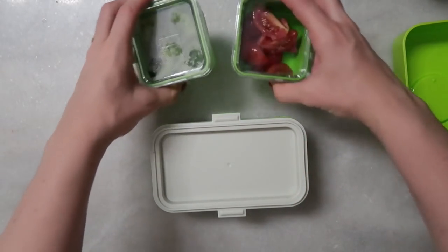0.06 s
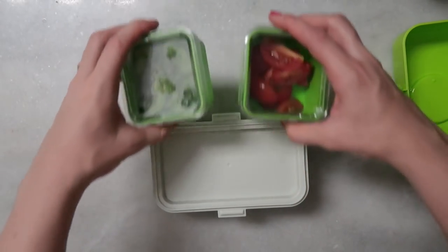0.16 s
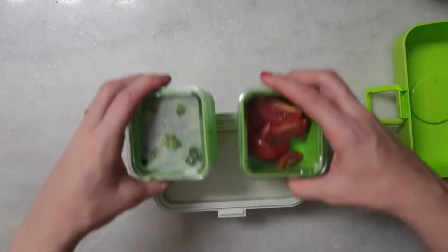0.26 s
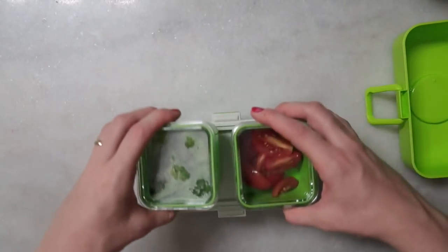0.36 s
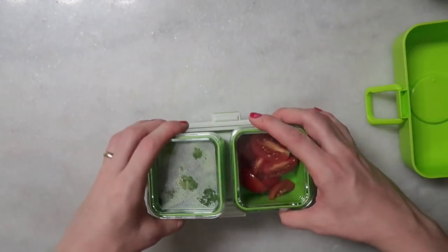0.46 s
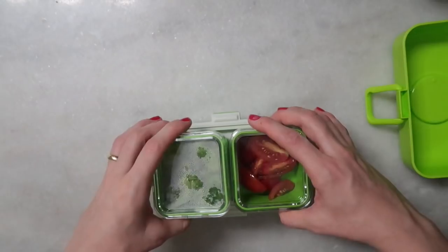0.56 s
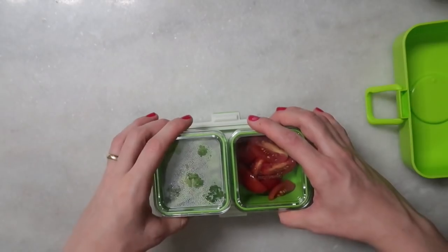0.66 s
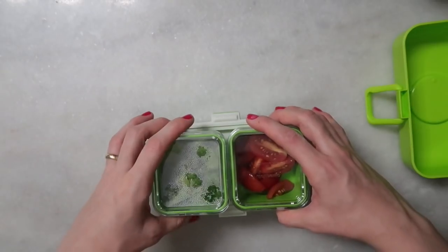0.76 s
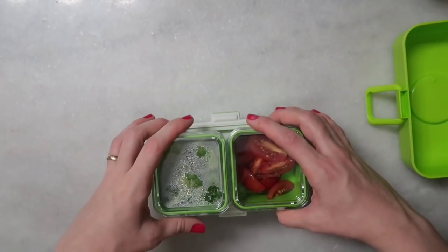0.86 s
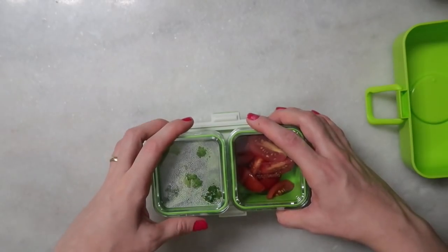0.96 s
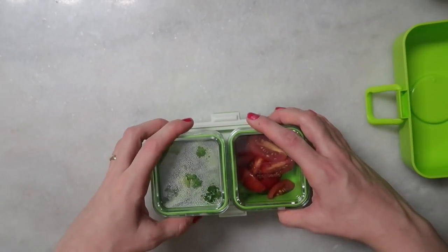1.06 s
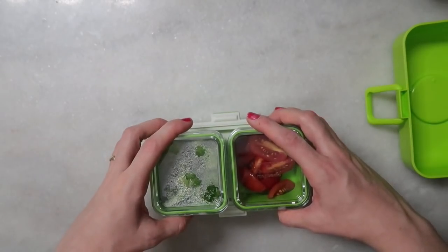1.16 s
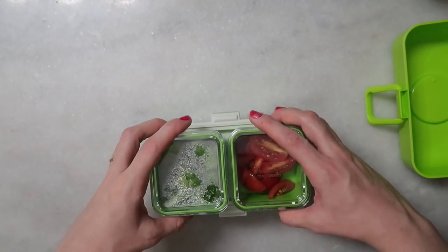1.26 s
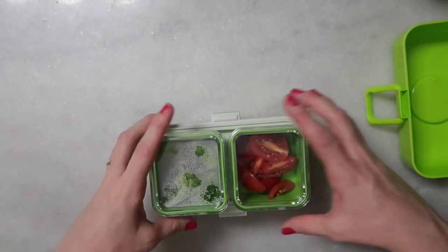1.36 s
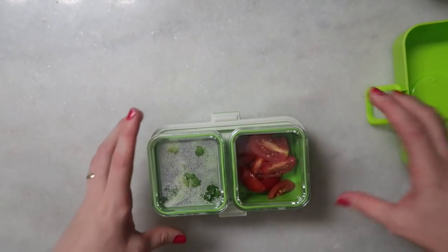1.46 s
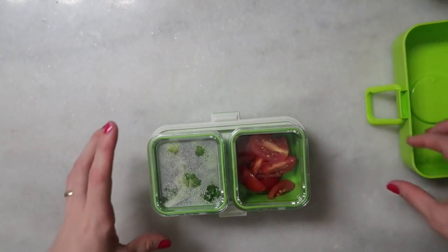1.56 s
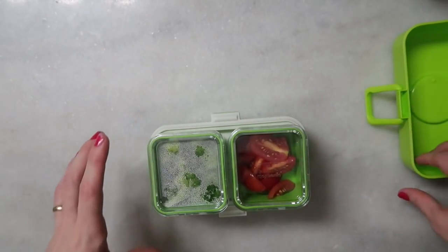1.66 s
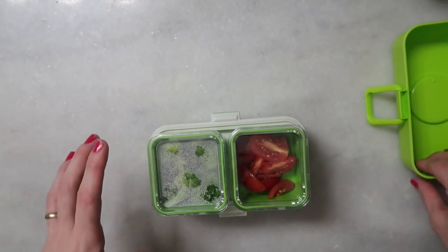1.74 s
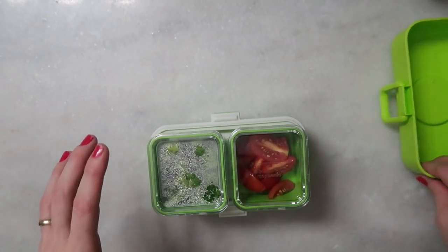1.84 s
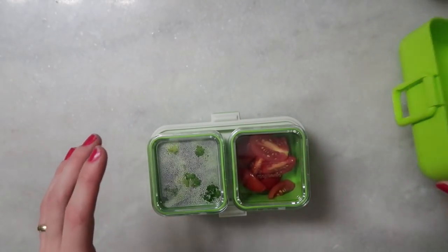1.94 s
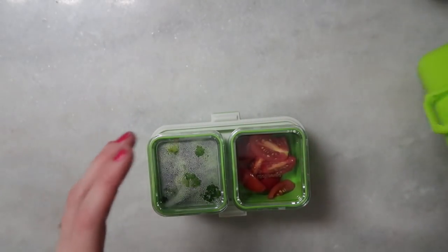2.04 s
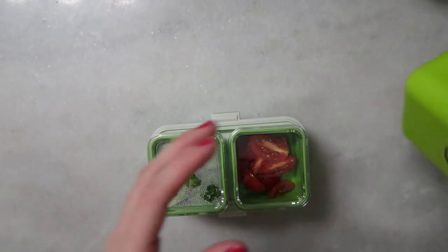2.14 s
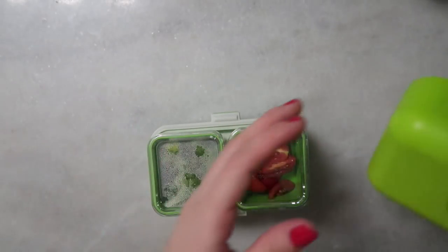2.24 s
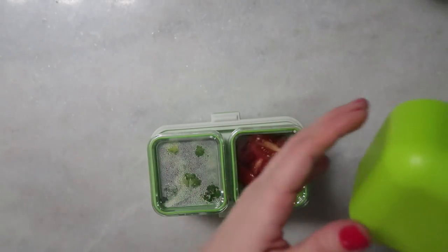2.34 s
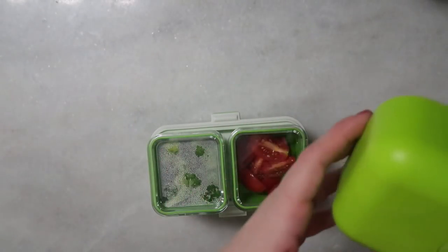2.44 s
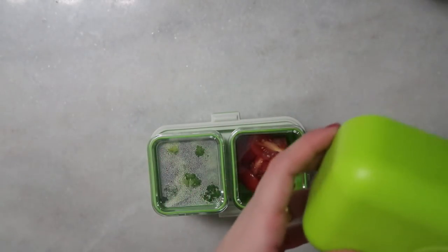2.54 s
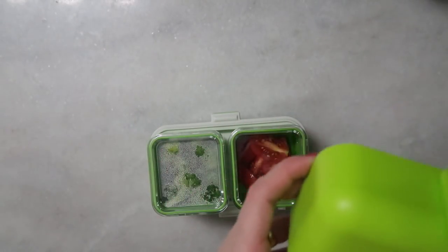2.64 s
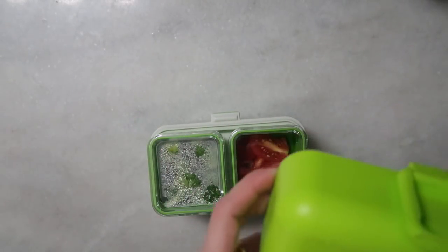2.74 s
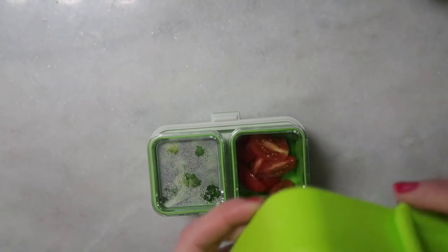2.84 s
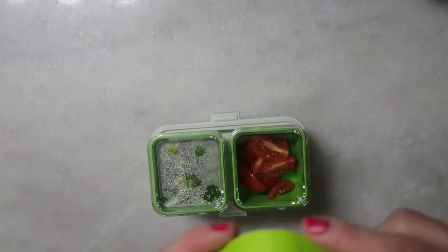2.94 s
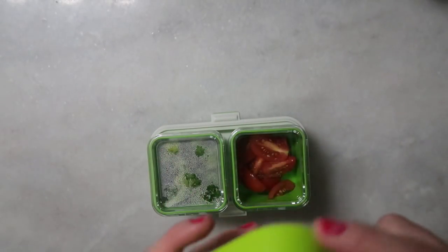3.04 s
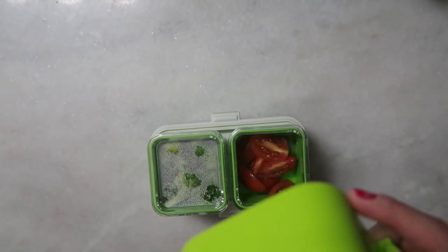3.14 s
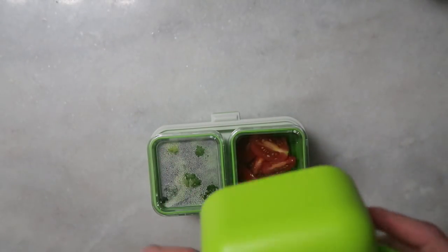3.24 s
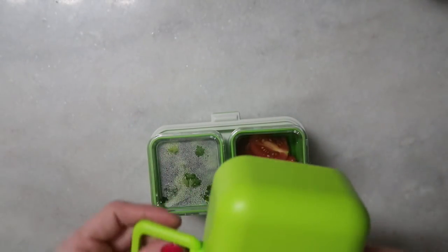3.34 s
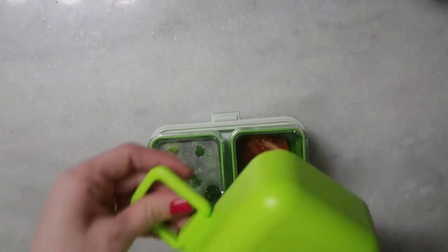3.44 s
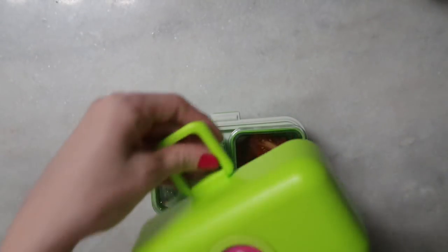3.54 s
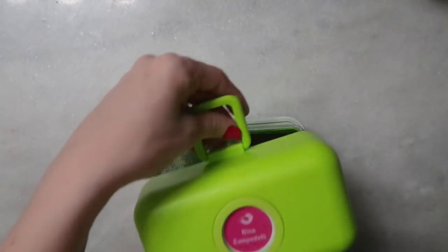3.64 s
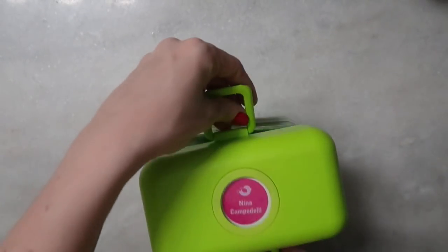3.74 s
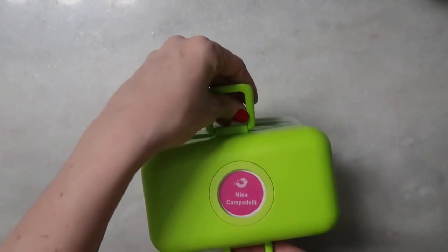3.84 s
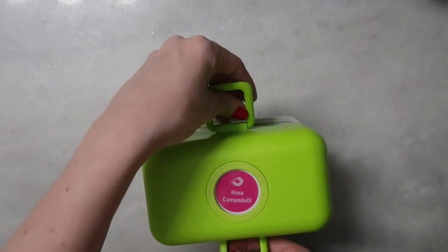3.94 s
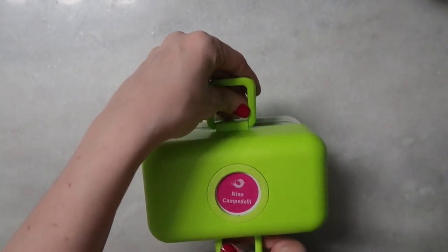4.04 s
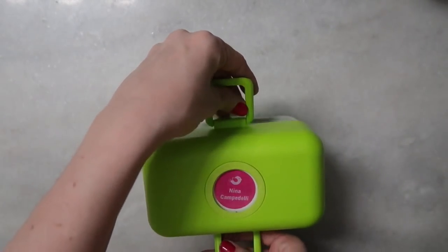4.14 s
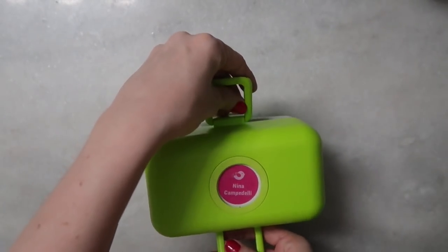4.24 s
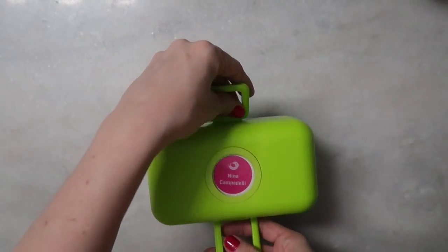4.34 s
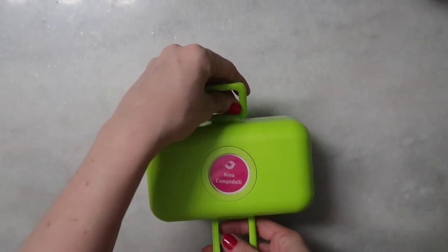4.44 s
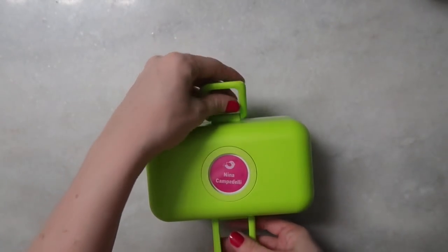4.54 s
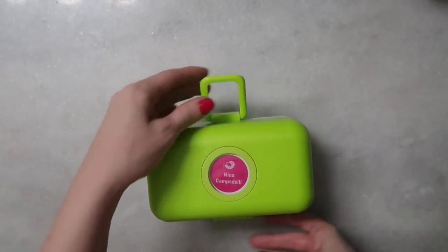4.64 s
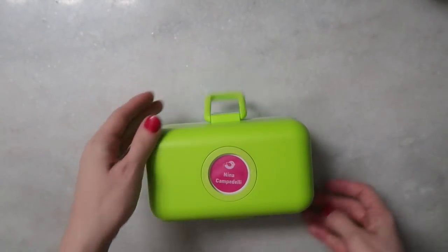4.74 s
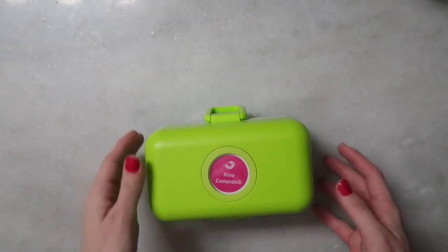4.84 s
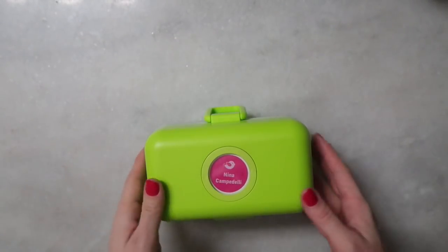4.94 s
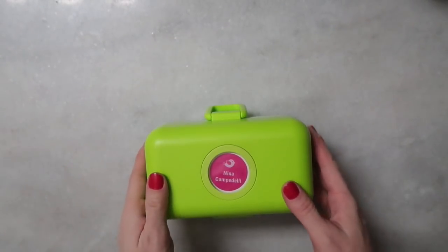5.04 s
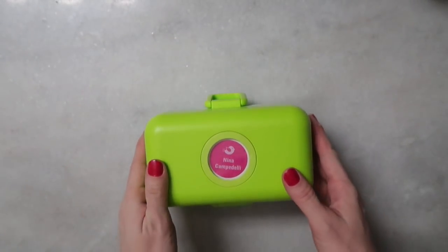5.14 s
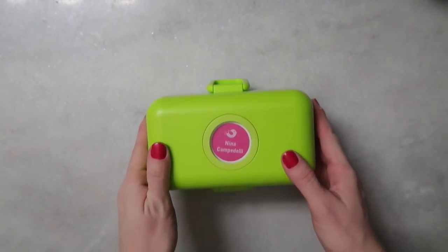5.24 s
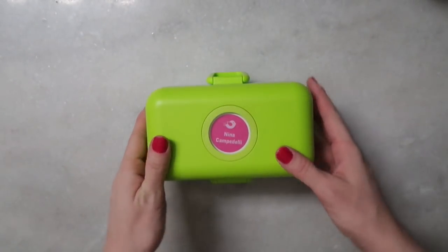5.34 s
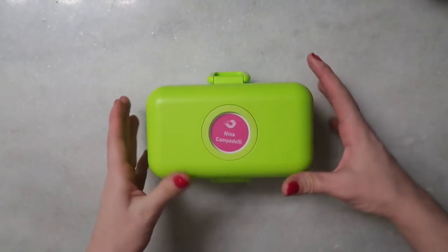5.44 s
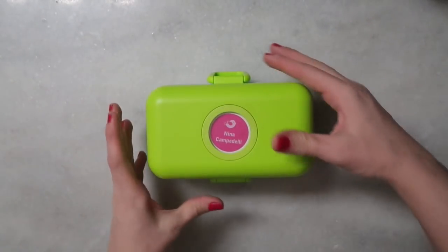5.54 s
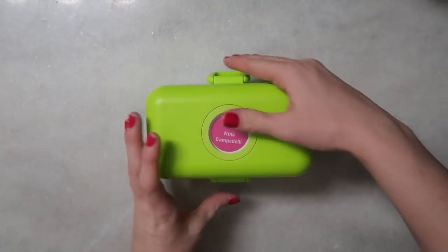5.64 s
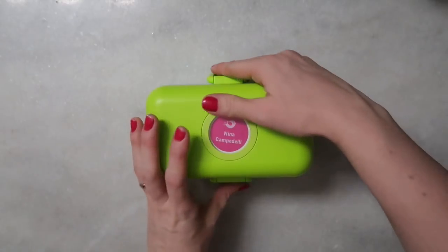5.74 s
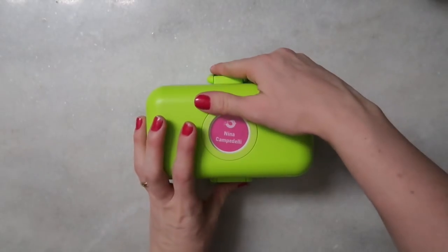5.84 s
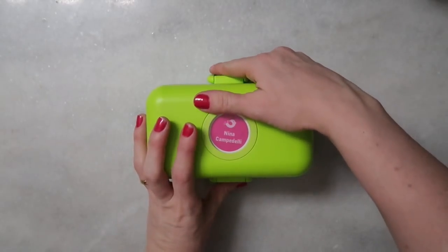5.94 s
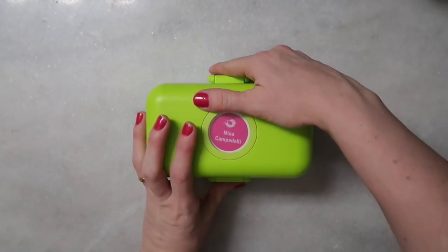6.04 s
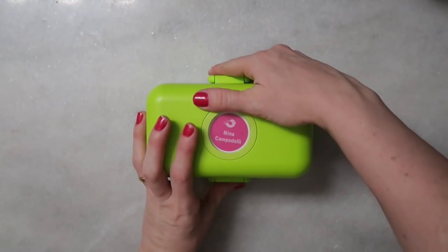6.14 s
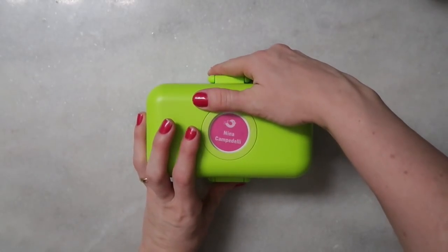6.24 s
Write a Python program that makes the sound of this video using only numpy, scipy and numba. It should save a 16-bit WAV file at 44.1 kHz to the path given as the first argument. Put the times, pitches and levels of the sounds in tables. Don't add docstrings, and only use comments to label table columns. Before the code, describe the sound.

Near-silent house air and a faint fridge hum in a hard-surfaced kitchen, heard by a close stereo phone microphone whose lens motor ticks very faintly. At 0.6-0.85 s two small plastic tubs clack into a tray in a quick cluster of low, hollow, damped knocks; tiny settling taps follow at 1.1-1.4. From 1.7 to 2.1 an empty lid is picked up with higher, ringing clatter, strongest near 1.97. Soft skin rubs and taps lead to a sharp rim crack at 3.15, then more rubbing until 3.9. At 4.0-4.5 the lid knocks down onto the tray, heavy at 4.04, 4.40 and 4.47, with a faint falling hollow tone between. At 4.76 it drops home, the loudest, booming thump, with a second knock at 4.87 and short reverberation. Quiet pats and rubs follow from 5.1 to 5.9, then a small bright latch snap at 6.21 and room tone until 7.

```python
import sys
import numpy as np
from scipy import signal
from scipy.fft import rfft, irfft, next_fast_len
from scipy.io import wavfile
from scipy.ndimage import uniform_filter1d
from numba import njit

SR = 44100
rng = np.random.default_rng(int(sys.argv[2]) if len(sys.argv) > 2 else 0)


def how_loud(loudness_db):
    steps = np.asarray(loudness_db, float) / 20
    return 10 ** steps


def output_pcm(signal):
    pcm = np.clip(np.atleast_2d(signal).T, -1, 1) * 32767
    wavfile.write(sys.argv[1], SR, np.round(pcm).astype(np.int16))


N = 277356
SPAN = 4096

HANDLED_FROM_S = [0, 1.6, 2.3, 3.9, 4.6, 6.1, 7]
# [f/Hz, width/Hz, level/dB]
EMPTY_LID_WALLS = [(800, 42, -12), (890, 360, 1.5), (1394, 390, -0.5), (1710, 89, 2), (1780, 630, -14.5),
                   (2310, 88, -0.5), (2410, 580, 4.5), (2895, 400, 0), (3350, 130, -17.5)]


def level(x, db):
    return x * how_loud(db) / np.sqrt(np.mean(x ** 2))


def on_log(table, hz):
    f, v = np.transpose(table)
    return np.interp(np.log(np.maximum(hz, 1)), np.log(f), v)


def colour(x, table):
    n = next_fast_len(N + SPAN)
    gain = how_loud(on_log(table, np.fft.rfftfreq(n, 1 / SR)))
    return irfft(rfft(x, n) * gain, n)[..., :N]


def ring(x, hz, width):
    return signal.lfilter(*signal.iirpeak(hz, hz / width, SR), x)


@njit
def svf(x, hz, k, rate):
    y, b, l = np.empty(len(x)), 0., 0.
    for i in range(len(x)):
        g = np.tan(np.pi * hz[i] / rate)
        v = (b + g * (x[i] - l)) / (1 + g * (g + k))
        b, l, y[i] = 2 * v - b, l + 2 * g * v, k * v
    return y


def walk(rate):
    k = int(SR / rate)
    held = np.repeat(rng.standard_normal(N // k + 1), k)
    return np.sqrt(2) * uniform_filter1d(uniform_filter1d(held, k), k)[:N]


def add(track, s, sound):
    i = int(s * SR)
    track[..., i:i + sound.shape[-1]] += sound[..., :N - i]


def in_play(db):
    return how_loud(db)[np.searchsorted(HANDLED_FROM_S, np.arange(N) / SR, side="right") - 1]


def shelf(x, hz, kind, db):
    part = signal.sosfiltfilt(signal.butter(2, hz, kind, fs=SR, output="sos"), x)
    return x + part * (in_play(db) - 1)


def struck(modes, t, damping, loud=0, tune=0):
    f, w, db = np.transpose(modes)
    n = len(f)
    loud, tune = (loud + np.zeros(16))[:n], (tune + np.zeros(16))[:n]
    size = (-1.) ** np.arange(n) * how_loud(db + 3.0 * loud) * np.sqrt(damping * w)
    fade = np.exp(-np.pi * damping * w[:, None] * t)
    hz = f * (1 + 0.025 * tune)
    return size @ (fade * np.sin(2 * np.pi * hz[:, None] * t))


def knocks(table, walls, edges, hollow_q, linger_db, damping, hard_ms, linger_ratio):
    tracks, t = np.zeros((2, N)), np.arange(SPAN) / SR
    all_round = [struck(walls, t[:1024], 3.2 * damping), struck(edges, t[:1024], 5.5 * damping)]
    span = hard_ms / 1000
    for s, hollow_db, hz, wall_db, edge_db in table:
        contact, (loud, tune) = rng.standard_normal(512), rng.standard_normal((2, 16))
        chatter = contact * np.abs(contact) * t[:512] * np.exp(-t[:512] / (0.35 * span))
        chatter[int(.3 * span * SR)] += 0.7 * np.sqrt(np.sum(chatter ** 2))

        air_modes = [(hz, min(hz / hollow_q, 330), 0), (1.299 * hz, hz / hollow_q, -11),
                     (linger_ratio * hz, hz / 26, linger_db - 12 * (hz > 1500))]
        hollow = struck(air_modes, t, 1.0, loud)
        hollow = hollow * (1 - np.exp(-(t / (0.91 * span)) ** 2))
        to_room = 1.3 * hollow * np.exp(-t * hz / 6.1)
        add(tracks, s, np.array([hollow, to_room]) * how_loud(hollow_db) / np.abs(hollow).max())

        for modes, db, out in zip((walls, edges), (wall_db, edge_db), all_round):
            up = signal.fftconvolve(chatter, struck(modes, t[:1024], damping, loud, tune))[:1024]
            up = up * how_loud(db) / np.abs(up).max()
            add(tracks, s, np.array([up, out * np.sqrt(np.sum(up ** 2) / np.sum(out ** 2))]))
    return tracks


def more_knocks(item):
    # [t/s, hollow peak level/dB, hollow f/Hz, walls peak level/dB, edge crack peak level/dB]
    further = [(.638, -24.5, 580, -48, -65), (.783, -27, 510, -36, -66), (.791, -29, 537, -29, -68),
               (.799, -19, 530, -43, -68), (.809, -31, 500, -42, -65), (.861, -30, 716, -46, -63),
               (1.736, -25, 800, -29, -43), (1.751, -31, 1190, -41, -46), (1.759, -31, 800, -32, -45),
               (1.773, -34, 1220, -33, -54), (1.802, -25, 1220, -26.5, -59), (1.886, -29, 1200, -31, -42),
               (1.972, -20, 1216, -28, -37), (1.986, -26, 1220, -43, -46), (2.732, -27.5, 1960, -56, -66),
               (2.898, -45.5, 950, -31, -54.5), (3.157, -20, 1650, -23, -24), (3.162, -21, 1580, -19.5, -40),
               (4.011, -18, 890, -35, -60), (4.005, -24, 2200, -30, -41), (4.033, -28, 845, -55, -71),
               (4.0415, -20, 2320, -10, -19.5), (4.057, -33, 800, -29, -45.5), (4.164, -32, 700, -43, -67),
               (4.186, -26.5, 713, -42.5, -63), (4.213, -24.5, 594, -33.5, -58),
               (4.221, -23, 570, -45.5, -60), (4.236, -32.5, 687, -36.5, -59.5), (4.259, -33, 574, -51, -69),
               (4.404, -19.5, 2410, -29, -34), (4.478, -21, 620, -15, -39), (4.482, -15, 900, -27, -28),
               (4.498, -20, 390, -27, -65), (4.89, -31, 466, -44, -47), (4.922, -31, 495, -50, -65),
               (6.204, -42, 1100, -54, -46), (6.209, -32, 960, -23, -41), (6.217, -38, 1100, -42, -33.5),
               (6.228, -44, 1040, -41.5, -50)]
    return [row for row in further if HANDLED_FROM_S[item] <= row[0] < HANDLED_FROM_S[item + 1]]


def background():
    # [f/Hz, level/dB]
    air_colour = [(20, -26), (45, -3), (80, -5.5), (130, -3), (222, -6.5), (310, -14.5), (422, -7.5),
                  (527, -21), (780, -14), (900, -22.5), (2300, -24.5), (4200, -31), (11400, -40.5),
                  (16000, -44)]
    # [f/Hz, width/Hz, level/dB]
    fridge = [(60.6, 11, -71.5), (101, 11, -56.5), (364.6, 34.4, -53.5)]
    air = level(colour(rng.standard_normal(N), air_colour), -51) * how_loud(0.6 * walk(4.1))
    for f, w, db in fridge:
        air = air + level(ring(rng.standard_normal(N), f, w), db) * how_loud(2.5 * walk(2.8))
    return air


def kitchen():
    # [f/Hz, T60/s]
    t60 = [(100, 0.76), (400, 0.71), (1500, 0.69), (4000, 0.58), (9000, 0.37), (16000, 0.04)]
    # [f/Hz, level/dB]
    tint = [(100, 14.5), (500, -1), (800, 5.5), (1150, 11.5), (1550, 7), (2300, 4.5), (3200, 3),
            (5000, 2.5), (7500, 1.5), (10000, -3.5)]
    t = np.arange(SR) / SR
    early = 1 + 1.6 * np.exp(-t / 0.017)
    tail = 0
    for hz in 90 * 2 ** np.arange(0, 7.6, .5):
        band = ring(ring(rng.standard_normal(SR), hz, hz / 2), hz, hz / 2)
        fade = how_loud(on_log(tint, hz) - 60 * t / on_log(t60, hz))
        tail = tail + np.sqrt(hz) * fade * early * level(band, 0)
    tail = tail * np.clip((t - .004) / 0.00022, 0, 1)
    return tail / np.sqrt(np.sum(tail ** 2))


def tubs():
    # [t/s, hollow peak level/dB, hollow f/Hz, walls peak level/dB, edge crack peak level/dB]
    hits = [(.016, -37, 930, -75, -74), (.603, -24.5, 550, -37, -62), (.607, -10.5, 550, -18.5, -69),
            (.617, -12, 546, -48, -62), (.632, -45, 553, -50, -59), (.654, -49, 610, -50, -57),
            (.668, -20.5, 560, -27.5, -41.5), (.677, -15.5, 467, -42, -68.5),
            (.7028, -12.5, 560, -17.5, -30), (.708, -17, 526, -42, -57), (.721, -27, 438, -46, -53),
            (.778, -23, 523, -37, -73), (.787, -26.5, 686, -31, -53), (.795, -25, 584, -35, -56),
            (.804, -16.5, 490, -31, -62), (.829, -12, 517, -11, -29), (.832, -9, 556, -28, -48),
            (.8545, -14, 585, -15, -41), (1.108, -40.5, 390, -63, -49), (1.239, -25, 550, -24.5, -50),
            (1.429, -37.5, 433, -69, -68)]
    # [f/Hz, width/Hz, level/dB]
    walls = [(1010, 1120, 5), (1340, 164, 2.5), (1410, 590, 5), (1870, 195, 2.5), (2120, 610, 0),
             (2340, 410, 4.5), (2640, 2100, -13.5), (3550, 580, -14)]
    edges = [(3740, 700, -2), (5940, 1100, -8), (8400, 520, -19), (10100, 580, -29), (10800, 420, -20),
             (13600, 300, -25), (14000, 210, -30), (14400, 180, -31)]
    return knocks([*hits, *more_knocks(0)], walls, edges, hollow_q=3.74, linger_db=-29.5,
                  damping=0.85, hard_ms=3.4, linger_ratio=0.69)


def rubs():
    # [t/s of firmest grip, fade/s, scrape level/dB, body level/dB, hiss level/dB]
    strokes = [(.02, 0.09, -81, -51, -81), (1.39, 0.0042, -58, -46, -84), (1.729, 0.0057, -37.5, -55, -51),
               (1.76, 0.014, -47, -48, -73), (1.9, 0.026, -58, -38, -58), (2.51, 0.038, -76, -56.5, -66),
               (2.626, 0.023, -64, -65, -60), (2.678, 0.018, -65, -52.5, -57),
               (2.76, 0.0092, -57.5, -70, -85), (2.906, 0.051, -67, -50, -55),
               (2.996, 0.024, -55, -51, -50.5), (3.065, 0.031, -69, -43.5, -48.5),
               (3.106, 0.0033, -56, -40, -43), (3.03, 0.037, -71, -46.5, -54),
               (3.3, 0.071, -82, -49.5, -60), (3.381, 0.027, -50.5, -53, -53.5),
               (3.49, 0.07, -56.5, -52.5, -61), (3.57, 0.048, -73, -56, -70),
               (3.685, 0.026, -59.5, -60, -61), (3.82, 0.051, -58, -55, -63),
               (3.864, 0.0094, -54.5, -40.5, -50), (5.216, 0.02, -86.5, -61, -67.5),
               (5.352, 0.08, -69, -70, -64.5), (5.444, 0.0054, -78, -56, -71),
               (5.79, 0.021, -75, -53, -60.5), (5.84, 0.039, -65.5, -58, -60.5),
               (6.212, 0.0029, -55.5, -30.5, -45)]
    # [f/Hz, level/dB per Hz]
    hiss = [(1760, -28.5), (3000, -0.5), (4380, 0), (5800, -4), (6260, -7), (12300, -8), (14700, -8),
            (16000, -52)]
    # [t/s, f/Hz]
    grip_pitch = [(1.8, 4140), (2.6, 5340), (3.1, 5900), (3.37, 5640), (3.54, 4930), (3.68, 6200),
                  (3.77, 5600), (3.87, 5900), (5.3, 5940), (5.8, 5340)]
    # [t/s, half length/s, level/dB, f/Hz, width/Hz]
    skim = (.49, .1, -62, 1760, 300)
    t = np.arange(N) / SR
    grains = rng.standard_normal((3, N)) * how_loud(2.1 * rng.exponential(size=N) + 2.14 * walk(67))
    body = signal.fftconvolve(grains[0], struck([(1150, 140, 0.39), *EMPTY_LID_WALLS], t[:SPAN], 1.4))[:N]
    hz = np.interp(t, *np.transpose(grip_pitch))

    scrape, rate = 0, 1. * SR
    for f, db in ((0.95 * hz, 0), (1.2 * hz, -4 + 4 * np.sin(2 * np.pi * 7.6 * t))):
        scrape = scrape + svf(svf(grains[2], f, .17, rate), f, .17, rate) * how_loud(db)
    layers = np.array([level(scrape, 0), level(body, 0), level(colour(grains[1], hiss), 0)])
    presses = [np.exp(-np.abs(t - s) / fade) for s, fade, *_ in strokes]
    grip = how_loud(np.array(strokes)[:, 2:]).T @ presses

    s, half, db, hz, width = skim
    slide = level(ring(ring(rng.standard_normal(N), hz, width), hz, width), db)
    return np.sum(grip * layers, axis=0) + slide * np.exp(-((t - s) / half) ** 4)


def lens():
    # [from t/s, to t/s]
    focus = [
        (.31, 1.12),
        (3.52, 4.42),
        (5.29, 5.58),
        (5.66, 6.7),
    ]
    # [f/Hz, width/Hz, level/dB]
    modes = [(4100, 180, 0.5), (4360, 215, -1)]
    pause, size = rng.uniform(size=(N // 400, 2)).T
    s = np.cumsum((0.52 + 2.1 * pause) / 23)
    on = np.any([(s > a) & (s < b) for a, b in focus], axis=0) & (s < N / SR)
    steps = np.bincount((s[on] * SR).astype(int), how_loud(11 * size[on]), N)
    return level(signal.fftconvolve(steps, struck(modes, np.arange(1024) / SR, 0.92))[:N], -64.5)


def lift():
    # [t/s, hollow peak level/dB, hollow f/Hz, walls peak level/dB, edge crack peak level/dB]
    hits = [(1.714, -26, 930, -18, -45.5), (1.7215, -17, 1124, -18, -30), (1.729, -18.5, 800, -18, -34.5),
            (1.744, -26, 1180, -17.5, -32.5), (1.795, -25, 1180, -32, -64), (1.88, -13, 1174, -14.5, -21),
            (1.896, -23, 1230, -24, -45), (1.924, -18.5, 1190, -11.5, -28.5),
            (1.9678, -11, 1180, -6.5, -7.5), (1.982, -54, 1150, -30, -53), (2.001, -30, 1300, -29, -61),
            (2.073, -38, 1150, -25, -52), (2.058, -9.5, 2143, -15, -19)]
    # [f/Hz, width/Hz, level/dB]
    edges = [(4960, 1000, 3.5), (6140, 370, -8), (6560, 210, -10), (8300, 250, -22), (8120, 280, -11.5),
             (9300, 510, -8), (9500, 140, -12.5), (11300, 160, -8), (12500, 270, -16), (15100, 290, -44)]
    rim = [(3500, 610, -1.5)]
    return knocks([*hits, *more_knocks(1)], EMPTY_LID_WALLS, [*edges, *rim], hollow_q=8, linger_db=-13,
                  damping=1.26, hard_ms=2.4, linger_ratio=0.94)


def thuds():
    # [t/s, peak level/dB, f/Hz]
    blows = [(1.715, -27.5, 343), (1.723, -22, 390), (1.744, -27, 396), (1.793, -30, 487),
             (1.878, -26, 434), (1.922, -25.5, 382), (1.724, -28.5, 219), (3.155, -33, 260),
             (3.259, -41.5, 99), (4.043, -24, 254), (4.4, -25.5, 290), (4.47, -26, 176), (4.509, -35.5, 94),
             (4.757, -31, 89.5), (4.49, -27, 348), (4.043, -30, 400), (5.12, -33, 273), (5.788, -42, 102),
             (6.212, -26.5, 250)]
    track, t = np.zeros(N), np.arange(SPAN) / SR
    for s, db, hz in blows:
        swing = np.sin(2 * np.pi * hz * t) * t * np.exp(-t * hz / 0.52)
        add(track, s, swing * how_loud(db) / np.abs(swing).max())
    return track


def turn():
    # [t/s, hollow peak level/dB, hollow f/Hz, walls peak level/dB, edge crack peak level/dB]
    hits = [
        (2.622, -41, 1150, -41, -61),
        (2.731, -26, 1023, -29.5, -67),
        (2.996, -26.5, 1010, -34.5, -51),
        (3.153, -12, 1930, -4, -5),
        (3.155, -14, 915, -15.5, -18),
        (3.258, -30, 354, -30, -65),
        (3.377, -31.5, 1065, -45, -64),
        (3.425, -35, 1010, -38, -56),
        (3.795, -34, 1200, -41.5, -65),
        (3.862, -38.5, 1060, -40, -77),
    ]
    # [f/Hz, width/Hz, level/dB]
    walls = [(960, 164, -2), (1250, 350, -6), (1580, 200, 1.5), (1930, 410, 0.5), (2218, 190, 2.5),
             (2353, 190, -6), (2660, 110, -5.5), (2960, 530, -9.5), (3170, 170, -10)]
    edges = [(3700, 120, 2.5), (4450, 120, 0), (5490, 180, 0.5), (6770, 380, -11), (7940, 810, -12.5),
             (9900, 270, -17.5), (11200, 420, -13), (12430, 430, -26), (12540, 190, -18), (13600, 300, -27),
             (15300, 286, -35.5)]
    return knocks([*hits, *more_knocks(2)], walls, edges, hollow_q=7.2, linger_db=-35,
                  damping=1.35, hard_ms=2.7, linger_ratio=0.7)


def graze(table):
    t, (s, hz, db) = np.arange(N) / SR, np.transpose(table)
    band = svf(rng.standard_normal(N), np.interp(t, s, hz), 0.035, 1. * SR)
    return level(band, 0) * how_loud(np.interp(t, s, db, -120, -120))


def closing_gap():
    # [t/s, f/Hz, level/dB]
    path = [(3.998, 890, -70.5), (4.007, 870, -35), (4.035, 844, -43), (4.06, 763, -29.5), (4.11, 731, -40),
            (4.16, 683, -44.5), (4.2, 625, -35), (4.25, 610, -50.5), (4.3, 574, -69)]
    return graze(path)


def lower():
    # [t/s, hollow peak level/dB, hollow f/Hz, walls peak level/dB, edge crack peak level/dB]
    hits = [(4.001, -14, 830, -17.5, -39), (4.0398, -2.5, 524, -11, -17.5), (4.045, -6, 653, -31.5, -39),
            (4.063, -20, 710, -41, -72.5), (4.077, -18, 803, -57, -36), (4.14, -32, 725, -48, -47),
            (4.179, -18, 553, -33.5, -80), (4.19, -22, 507, -23.5, -43), (4.204, -24.5, 442, -36, -50),
            (4.268, -29, 416, -40, -62), (4.296, -28.5, 670, -27, -41), (4.341, -16.5, 634, -24.5, -43),
            (4.4015, -7.5, 568, -8.5, -23.5), (4.409, -14, 542, -33, -54), (4.473, -6, 513, -5.5, -24.5),
            (4.4855, -8, 513, -14, -37), (4.5085, -21, 710, -55, -30)]
    # [f/Hz, width/Hz, level/dB]
    walls = [(1060, 270, -2), (1297, 94, -1), (1675, 220, -3.5), (1920, 430, -5.5), (2315, 240, 1),
             (2850, 580, -7.5), (3110, 320, -11)]
    edges = [(3790, 220, 1.5), (5430, 280, -1), (6470, 330, -10), (7760, 190, -26), (9120, 410, -18),
             (11080, 400, -13.5), (12500, 337, -19.5), (13900, 540, -38)]
    return knocks([*hits, *more_knocks(3)], walls, edges, hollow_q=3.94, linger_db=-19,
                  damping=1, hard_ms=2, linger_ratio=1.3)


def shut_hum():
    # [t/s, f/Hz, level/dB]
    path = [(4.5, 448, -76), (4.52, 434, -37.5), (4.74, 448, -53), (4.77, 467, -35), (4.9, 469, -30),
            (4.98, 493, -43.5), (5.1, 470, -71)]
    return graze(path)


def close():
    # [t/s, hollow peak level/dB, hollow f/Hz, walls peak level/dB, edge crack peak level/dB]
    hits = [(4.7562, 3, 481, 3, 4.5), (4.849, -41, 461.7, -40, -28), (4.858, -18, 488, -44, -50),
            (4.872, -2.5, 466, -10, -10.5), (4.8735, -13, 2310, -23, -23), (5.12, -32, 348, -33, -66),
            (5.147, -29, 490, -67, -51), (5.216, -41, 520, -43, -67), (5.444, -45, 332, -51, -62),
            (5.472, -38.5, 403, -65, -67), (5.761, -30.5, 403, -40, -60), (5.789, -30.5, 456, -72, -58),
            (5.81, -34.5, 312, -59, -58), (5.851, -24, 454, -27, -44), (5.893, -34, 398, -38, -51),
            (4.7574, -8, 3920, -24, -46)]
    # [f/Hz, width/Hz, level/dB]
    walls = [(1180, 280, 1), (1580, 120, -1.5), (1886, 210, -4.5), (2194, 220, 3), (2340, 146, -1),
             (2880, 950, -3.5), (3270, 320, -6)]
    edges = [(3680, 500, 1), (5000, 580, -13.5), (6610, 150, -16.5), (7800, 540, -12.5), (9210, 370, -22.5),
             (9700, 750, -25.5), (11000, 520, -23.5), (14200, 630, -45.5), (14240, 280, -32.5),
             (15300, 590, -37)]
    return knocks([*hits, *more_knocks(4)], walls, edges, hollow_q=2.2, linger_db=-16.5,
                  damping=1.9, hard_ms=2.3, linger_ratio=1.0)


def latch():
    # [t/s, hollow peak level/dB, hollow f/Hz, walls peak level/dB, edge crack peak level/dB]
    hits = [
        (6.2135, -24, 4170, -18, -33),
        (6.2125, -20, 860, -13, -22.5),
        (6.241, -32, 846, -43, -54),
    ]
    # [f/Hz, width/Hz, level/dB]
    walls = [(1100, 220, 0.5), (1610, 210, 0), (1730, 380, 3), (2310, 310, 2), (2600, 210, -10.5),
             (2970, 610, -10)]
    edges = [(3800, 130, -1), (3930, 140, -12), (5000, 290, -3), (5740, 175, -4), (7100, 260, -10.5),
             (7970, 150, -46), (9790, 290, -22), (11600, 340, -23), (12700, 330, -33)]
    return knocks([*hits, *more_knocks(5)], walls, edges, hollow_q=5, linger_db=-13.5,
                  damping=1, hard_ms=3, linger_ratio=0.89)


def scene():
    room_share = [0.5, 0.8, -3.5, 1, -3.5, -0.9]
    near_bass = [1.2, -13, -2, 1.2, -0.1, 0.1]
    room_bass = [-2, 2.5, -13, -2.5, -2, 5.7]
    room_treble = [-4, 0, 2, -2, 2, 5.5]
    # [f/Hz, gain/dB]
    box_side = [(60, -18.5), (110, -17.5), (200, -28), (380, -25.5), (700, -28.5), (1290, -17), (2380, -9),
                (4400, -0.5), (8120, 7), (15000, 17)]
    air_side = [(60, -29.5), (110, -22), (200, -6), (380, -9), (700, -3), (1290, 0.5), (2380, -1.5),
                (4400, 1.5), (8120, -0.5), (15000, 6)]
    # [t/s, share nearer the left port]
    lean = [(1.5, 0), (1.7, 0.13), (2.8, 0.073), (3.3, 0.024), (3.9, 0.013)]
    box = tubs() + rubs() + lift() + turn() + lower() + close() + latch()
    box = box + closing_gap() + shut_hum()
    room, air, side_room, side_air, ticks = kitchen(), background(), kitchen(), background(), lens()

    near, out = colour(box, [(60, -29.0), (150, -14.5), (280, 0.5)])
    near = shelf(near, 754, "low", near_bass)
    out = shelf(out * in_play(room_share), 754, "low", room_bass)
    out = shelf(out, 1950, "high", room_treble)
    thud = thuds()
    out = out + 0.83 * thud

    echo = how_loud(-11.0) * signal.fftconvolve(out, room)[:N]
    side_echo = how_loud(-14.5) * signal.fftconvolve(out, side_room)[:N]
    mid = near + thud + echo + air + how_loud(-12) * ticks
    side = colour(0.13 * out + side_echo, box_side) + colour(side_air, air_side) + ticks
    side = side + near * np.interp(np.arange(N) / SR, *np.transpose(lean))
    return np.array([mid + side, mid - side])


def low_pass(x):
    return signal.sosfilt(signal.butter(12, 16320, fs=SR, output="sos"), x)


def record(dry):
    # [f/Hz, level/dB]
    mic_top = [(8000, 0), (13000, -6), (15500, -14), (17000, -14)]
    heard = colour(dry, mic_top)
    over = np.maximum(np.abs(heard).max(axis=0) - .6, 0)
    duck = signal.lfilter([.03], [1, -np.exp(-1 / (0.049 * SR))], np.roll(over, 180))
    duck = duck + signal.lfilter([.002], [1, -np.exp(-1 / (0.4 * SR))], over)
    push = .5 * uniform_filter1d(np.clip(over - .6, 0, .45), 150)
    heard = np.clip(heard / (1 + duck), -1, 1) - push
    finished = colour(heard, [(9000, 0), (16000, 2.0), (20000, -23.5)])
    return low_pass(np.clip(finished, -1, 1))


dry = scene()
out = record(dry)
output_pcm(out)
```